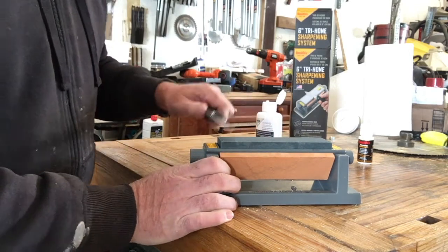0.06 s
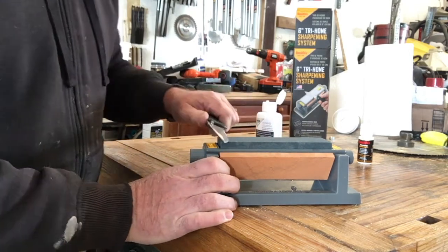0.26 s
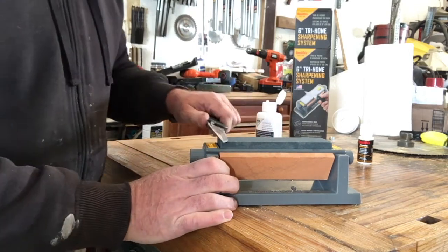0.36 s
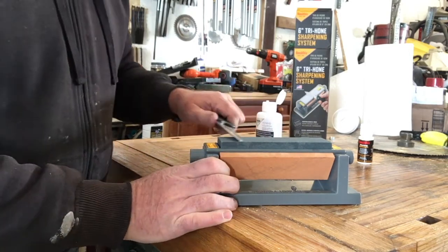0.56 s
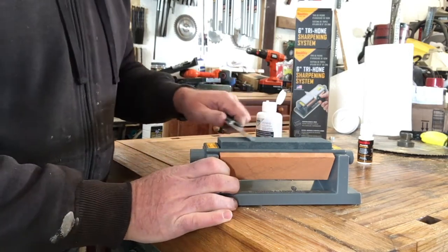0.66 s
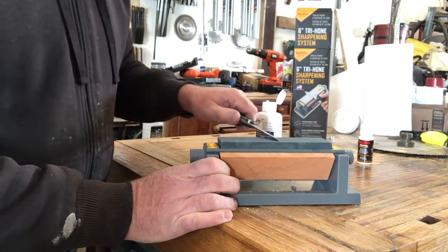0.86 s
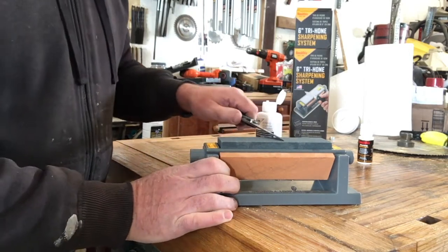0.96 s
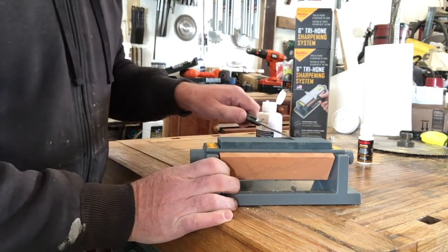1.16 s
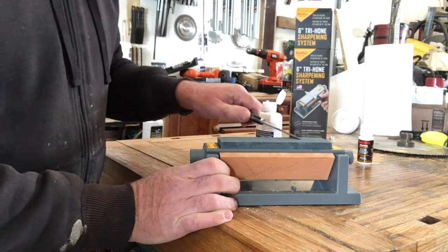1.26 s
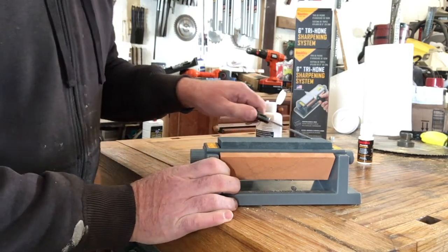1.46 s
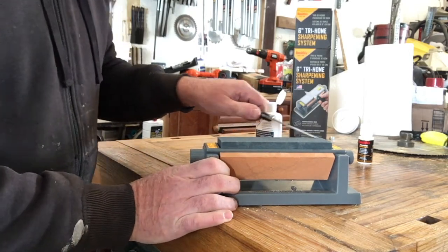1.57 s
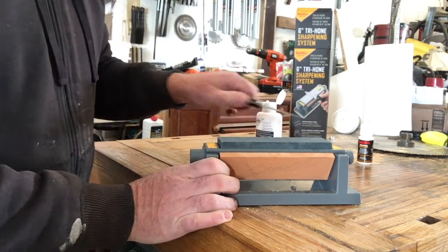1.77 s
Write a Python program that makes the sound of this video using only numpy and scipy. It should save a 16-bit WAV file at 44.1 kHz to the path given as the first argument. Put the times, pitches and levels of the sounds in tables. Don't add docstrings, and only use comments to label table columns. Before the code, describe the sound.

A steel knife is sharpened on a stone. After quiet room air, the blade clinks down at 0.2 s and rings briefly, resettling at 0.3. A long gritty metallic rasp runs from 0.4 to 0.9 s, with a short finish to 1.0. Small clicks, then a thinner, hollower scrape from 1.05 to 1.5 and a short fading one to 1.65. Faint cloth rustle, dull thuds, light room echo, low hum.

```python
import sys
import numpy as np
from scipy import signal
from scipy.fft import rfft, irfft, next_fast_len
from scipy.io import wavfile
from scipy.ndimage import uniform_filter1d

SR = 44100
rng = np.random.default_rng(int(sys.argv[2]) if len(sys.argv) > 2 else 0)


def elevation(decibels):
    levels = np.asarray(decibels, float)
    return 10 ** (levels / 20)


def file_out(sig):
    cols = np.atleast_2d(sig).T
    lim = np.clip(cols, -1, 1)
    pcm = np.round(lim * 32767).astype(np.int16)
    wavfile.write(sys.argv[1], SR, pcm)


N = 79380

# pitch_hz, width_hz, level_db
BENCH_TONES = [(206, 60, -3), (371.5, 58, 4.5), (543, 164, -2.5), (733, 170, 2.5)]


def evened(x):
    return x / np.sqrt(np.mean(x ** 2) + 1e-20)


def read(points, hz):
    f, value = np.transpose(points)
    return np.interp(np.log(hz + 1), np.log(f + 1), value)


def body(x, tones):
    size = next_fast_len(len(x) + 8192)
    hz = np.fft.rfftfreq(size, 1 / SR)
    response = 0
    for k, (pitch_hz, width_hz, level_db) in enumerate(tones):
        sign = (-1) ** k
        response = response + sign * elevation(level_db) / (1 + 1j * (hz - pitch_hz) / width_hz) ** 2
    response = response / np.sqrt(np.mean(abs(response) ** 2))
    return irfft(rfft(x, size) * response, size)[:len(x)]


def air():
    # pitch_hz, level_db per hz
    wash_shape = [(25, -40), (45, 4.5), (96, -5.5), (300, -14.5), (1270, -23.5), (4000, -34), (9000, -37.5),
                  (15600, -42.5)]
    # pitch_hz, width_hz, level_db
    hums = [(55.3, 3.7, -76.5), (90.6, 17, -71)]
    hz = np.fft.rfftfreq(N, 1 / SR)
    shaped = rfft(rng.standard_normal(N)) * elevation(read(wash_shape, hz))
    out = elevation(-67) * evened(irfft(shaped, N))
    for pitch_hz, width_hz, level_db in hums:
        out += elevation(level_db) * body(rng.standard_normal(N), [(pitch_hz, width_hz, 0)])
    return out


def shop_echo(x):
    # pitch_hz, decay_s
    decay = [(400, 0.37), (1300, 0.39), (3500, 0.45), (9000, 0.32)]
    taps = np.zeros(SR)
    at = np.arange(300, SR - 20, 20)
    taps[at + rng.integers(0, 20, len(at))] = rng.choice([-1., 1.], len(at))
    hz, t, z = signal.stft(taps, SR, nperseg=256)
    fade = elevation(-60 * t / read(decay, hz)[:, None])
    tail = signal.istft(z * fade, SR, nperseg=256)[1]
    return elevation(-5.5) * signal.fftconvolve(x, tail / np.linalg.norm(tail))[:N]


def swells(moves, tones):
    t = np.arange(N) / SR
    strength = np.zeros(N)
    for start_s, length_s, level_db in moves:
        progress = np.clip((t - start_s) / length_s, 0, 1)
        strength += elevation(level_db) * np.sin(np.pi * progress ** 0.75)
    return body(strength * rng.standard_normal(N), tones)


def sleeve():
    # start_s, length_s, level_db
    moves = [
        (.22, 0.079, -65.5),
        (.311, 0.049, -68),
        (1.6, 0.26, -69.5),
    ]
    # pitch_hz, width_hz, level_db
    cloth = [(2300, 1000, 5), (4100, 1300, -17), (6300, 600, 0), (8650, 350, -3.5), (10300, 1000, -12.5),
             (13400, 1800, -13.5)]
    return swells(moves, cloth)


def holder_thuds():
    # start_s, length_s, level_db
    shifts = [
        (.213, 0.011, -65),
        (1.012, 0.0068, -61),
        (1.385, 0.035, -56),
        (1.688, 0.008, -57.5),
    ]
    return swells(shifts, BENCH_TONES)


def contacts(hits, edge_tones):
    # pitch_hz, width_hz, level_db
    struck_blade = [(830, 84, -1), (1010, 50, 15), (1710, 79, 12), (1864, 50, -2.5), (2230, 250, 8),
                    (2510, 130, 8), (2760, 360, -10.5), (3150, 250, 7), (3550, 100, -4), (3760, 190, 3),
                    (4230, 230, 1)]
    # pitch_hz, width_hz, level_db
    struck_holder = [(880, 45, -10), (1030, 30, 0), (1150, 70, -9)]
    drive, u = np.zeros((3, N)), np.arange(400) / SR
    for start_s, *level_db in hits:
        drive[:, round(start_s * SR)] = elevation(np.array(level_db) + 21.0)
    scuff_fade = 0.12 * np.exp(-u / 0.0025)
    scuff = signal.oaconvolve(drive[0], scuff_fade)[:N] * rng.standard_normal(N)
    return body(scuff, edge_tones) + body(drive[1], struck_blade) + body(drive[2], struck_holder)


def singing_blade(start_s):
    # (time to fall by 60 dB, held to 0.45 s at most)
    partials = [(886, -75, 0.26), (970, -60, 0.5), (1610, -60, 0.78), (1686, -65, 0.62), (1852, -58, 0.61),
                (1880, -65, 0.56), (2353, -73, 0.44), (2208, -79, 0.29), (3100, -83, .4), (3957, -69, 0.35),
                (4102, -76, .24)]
    t = np.maximum(np.arange(N) / SR - start_s, 0)
    out = np.zeros(N)
    for pitch_hz, level_db, decay_s in partials:
        fade = elevation(level_db - 60 * t / min(decay_s, 0.45))
        out += fade * np.sin(2 * np.pi * pitch_hz * t)
    return out * np.minimum(t / 0.018, 1)


def blade_knocks():
    # start_s, edge_db, blade_db, holder_db
    hits = [(0.2144, -58.5, -39.5, -50), (0.2159, -64, -40, -49.5), (.2176, -64, -47, -70),
            (.2192, -74, -60, -52.5), (0.2213, -77, -53, -53.5), (.2236, -72, -58, -81),
            (0.31, -63, -62.5, -71), (.3155, -66.5, -55, -72), (.319, -77, -70, -58),
            (.9305, -77, -56, -52), (1.0185, -62, -57, -57.5), (1.0335, -78, -71, -61)]
    # pitch_hz, width_hz, level_db
    tick = [(5580, 870, -3), (5800, 300, 8.5), (7240, 1150, -6), (9650, 340, -4.5), (11600, 590, -21),
            (13400, 1500, -20)]
    # start_s, edge_db, blade_db, holder_db
    flat_hits = [
        (.3105, -69, -70, -70),
        (1.0135, -69, -62, -43),
        (1.0475, -68, -48, -52),
        (1.4921, -61, -54, -48),
    ]
    # pitch_hz, width_hz, level_db
    click = [(4500, 1500, -2), (7500, 1500, -2), (11300, 1200, 2), (14300, 1500, 0)]
    return contacts(hits, tick) + contacts(flat_hits, click) + singing_blade(hits[0][0])


def grit(n):
    per_s, spread_db = 16000, 1.2
    size = elevation(spread_db * np.minimum(rng.exponential(1, n), 5))
    met = rng.random(n) < per_s / SR
    return evened(rng.standard_normal(n) * size * met)


def wander(x):
    depth_db, patch_s = 2.5, 0.08
    hz, t, z = signal.stft(x, SR, nperseg=1024, noverlap=768)
    patch = rng.standard_normal(z.shape[::-1]).T
    patch = uniform_filter1d(patch, size=3, axis=0)
    patch = evened(uniform_filter1d(patch, max(round(patch_s * SR / 256), 1), axis=1))
    return signal.istft(z * elevation(depth_db * patch - 2), SR, nperseg=1024, noverlap=768)[1][:len(x)]


def judder():
    depth_db, fastest_hz = 0.93, 72
    tremble = signal.lfilter(*signal.butter(1, fastest_hz, fs=SR), rng.standard_normal(N))
    return evened(elevation(depth_db * evened(tremble)))


def snags():
    # edge_db, blade_db,
    # holder_db
    grains = [(0.4163, 6, 7, -1), (0.446, 5, 5, 5), (.465, 6, 4, 6), (0.468, 2, 2, -2), (.488, 0, 4, -27),
              (0.535, -5, 4.5, -1), (0.562, -1, -2, -2), (0.577, -1, 5, 10), (.613, 1, -1, 8),
              (.633, -2, -1, -2), (.666, 0.5, -1, -1), (0.683, 7, -1, -9), (.706, 6.5, 9.5, 13),
              (0.716, 5, -5.5, 7), (0.732, -1, -2, -6), (.753, 1, -3, -7), (0.773, 4, 4, 6),
              (0.779, 8, -8, 11), (0.808, 1.5, 4, 2), (.846, 10, 9, 9.5), (0.886, 7.5, -0.5, -2),
              (.901, -2, -2, -7), (0.929, 4.5, 6, 7), (0.941, -14, 5, -25), (1.059, 3.5, -6, -3),
              (1.075, 6.5, 5.5, 10), (1.119, 3, 4.5, 9), (1.125, 6, 6, 3), (1.152, 2, -10, -5),
              (1.194, -6, 0, 1), (1.204, -1, 15.5, 3), (1.217, 4, -4, 3), (1.2375, 8, 3, 2),
              (1.246, 2, 8, 3), (1.298, -7, -6, 11), (1.313, 1, 6, 8.5), (1.331, 5, 7, 10),
              (1.348, 7, 9.5, 2), (1.367, 0, 9, 2.5), (1.375, 7, 7, -5), (1.417, 12, 4, 5),
              (1.464, 1, -0.5, 0.5), (1.475, 9, 7.5, 2.5), (1.515, 3.5, 2, -12), (1.533, 3.5, 3, 9),
              (1.577, -6, 5, 0), (1.605, -13, 0, -2), (1.645, 3, 13, -3)]
    steady_db = [0.3, 0.23, -2.2]
    peak_s = 0.0015
    db, u = np.zeros((3, N)), np.arange(1000) / SR / peak_s
    for start_s, *lift_db in grains:
        db[:, round(start_s * SR)] = lift_db
    pulse = u * np.exp(1 - u)
    lift = signal.oaconvolve(db, pulse[None])[:, :N]
    return elevation(lift + np.array(steady_db)[:, None])


def stroke(path, bite_s, bench_db, edge, blade, holder, sheen):
    # pitch_hz, width_hz, level_db
    heel_blade = [(1617, 40, 1), (1910, 100, -3), (2147, 61, -9.5), (2325, 90, -2.5), (2504, 65, -3),
                  (2890, 440, -13)]
    heel_leaves_s, heel_slide_s, ring_out_s = 0.528, 0.11, 0.1
    s, level_db, blade_db, holder_db, sheen_db = np.transpose(path)
    span = slice(round((s[0] - ring_out_s) * SR), round((s[-1] + ring_out_s) * SR))
    t = (np.arange(N) / SR)[span]
    landing = np.clip((t - s[0]) / bite_s + 1, 0, 1)
    drive = elevation(np.interp(t, s, level_db)) * landing * (t < s[-1]) * judder()[span]
    on_edge, on_blade, on_holder = snags()[:, span]
    slid = np.pi / 2 * np.clip((t - heel_leaves_s) / heel_slide_s, 0, 1)
    ring = elevation(np.interp(t, s, blade_db)) * on_blade
    parts = [
        (on_edge, edge),
        (elevation(bench_db), BENCH_TONES),
        (ring * np.cos(slid), heel_blade),
        (ring * np.sin(slid), blade),
        (elevation(np.interp(t, s, sheen_db)) * on_edge, sheen),
    ]
    out = np.zeros(N)
    for share, tones in parts:
        out[span] += body(wander(grit(len(t))) * drive * share, tones)
    holder_share = elevation(np.interp(t, s, holder_db)) * on_holder
    out[span] += body(grit(len(t)) * drive * holder_share, holder)
    return out


def sharpening():
    # blade_db, holder_db, sheen_db
    pushes = [
        [(0.412, -57.5, 4.2, 4, -10), (0.432, -58.5, 8.8, 8, -9), (0.468, -51.5, 3.6, 0, -9),
         (0.496, -54.5, 6.7, 4.5, -7), (0.546, -58.5, 7.6, -2, -7), (0.668, -53.5, 11, -2, -7.5),
         (0.812, -53, 9.4, 3.5, -8), (0.826, -56.5, 4.3, -1, -14), (0.872, -61, 5, 6, -10)],
        [(0.879, -54.5, 8, 5.5, -8), (0.897, -54, 10.5, -1, -9), (0.936, -57.5, 2.7, 10.5, -6),
         (1.0, -70, 10, -10, -17)],
    ]
    pulls = [
        [(1.052, -53, 8.5, 3.8, -1), (1.084, -56, 4.8, 3.5, -4.5), (1.172, -62, 7.8, 14.1, -5),
         (1.232, -57.5, 2.6, 10.3, -1.5), (1.304, -59.5, 7.2, 9.1, -4), (1.358, -61.5, 2, 15.8, -7.5),
         (1.446, -68.5, 8.7, 13.9, -2), (1.468, -56.5, 3.9, 15, -9), (1.487, -70.5, 3.4, 17, -2)],
        [(1.495, -53, 5.7, 6.5, -3), (1.559, -58, 3.7, 10.6, -5.5), (1.61, -62.5, 5, 5.8, -15),
         (1.66, -88, 10, 4.1, -21)],
    ]
    bites = [.009, .006, .0048, .0035]
    bench_db = [-10.5, -9.5, -8, -10.5]
    # pitch_hz, width_hz, level_db
    blade_push = [(1654, 113, 0), (1792, 19, -1.5), (1917, 122, 3), (2250, 67, 2), (2400, 68, -1.5),
                  (2533, 51, 4), (2830, 290, -6)]
    blade_pull = [(1595, 80, -1), (1910, 134, -2), (2097, 110, -1.5), (2394, 97, -1), (2557, 68, 4),
                  (2896, 170, -3)]
    # pitch_hz, width_hz, level_db
    edge_push = [(3380, 300, -6), (4036, 365, 1.5), (5400, 550, -5.5), (6310, 540, -3.5),
                 (7560, 1100, -9.5), (9080, 770, -4), (9970, 330, -10)]
    edge_pull = [(3200, 740, -5.5), (4170, 630, -1.5), (4585, 410, -2), (5410, 470, -4), (6600, 540, -8),
                 (7320, 310, 0.5), (8250, 420, -1), (10000, 1600, -9.5)]
    # pitch_hz, width_hz, level_db
    sheen_push = [(11100, 1100, -0.5), (12180, 410, 2), (13100, 900, 1.5), (15600, 610, -0.5)]
    sheen_pull = [(10890, 320, 4.5), (11630, 440, 6.5), (13300, 1000, -4), (15000, 660, 0)]
    # pitch_hz, width_hz, level_db
    holder_heel = [(744, 56, -15), (876, 56, -6.5), (1005, 81, 1), (1052, 65, 4.5), (1196, 45, 0),
                   (1370, 100, -4)]
    holder = [(894, 67, -12.5), (935, 52, -1.5), (994, 58, -1), (1040, 40, 3), (1109, 34, -4),
              (1135, 28, -0.5), (1225, 138, -8)]
    out = stroke(pushes[0], bites[0], bench_db[0], edge_push, blade_push, holder_heel, sheen_push)
    out += stroke(pushes[1], bites[1], bench_db[1], edge_push, blade_push, holder, sheen_push)
    for path, bite_s, level_db in zip(pulls, bites[2:], bench_db[2:]):
        out += stroke(path, bite_s, level_db, edge_pull, blade_pull, holder, sheen_pull)
    return out


def scene():
    knife = sharpening() + blade_knocks() + holder_thuds() + sleeve()
    return (knife + shop_echo(knife) + air())[None]


def band_limit(x):
    return signal.sosfilt(signal.butter(12, 15710, fs=SR, output="sos"), x)


def record(dry):
    lowpass = signal.firwin(511, 15700, window=("kaiser", 9), fs=SR)
    limited = signal.oaconvolve(dry, lowpass[None], "same")
    return band_limit(limited)


dry = scene()
out = record(dry)
file_out(out)
```